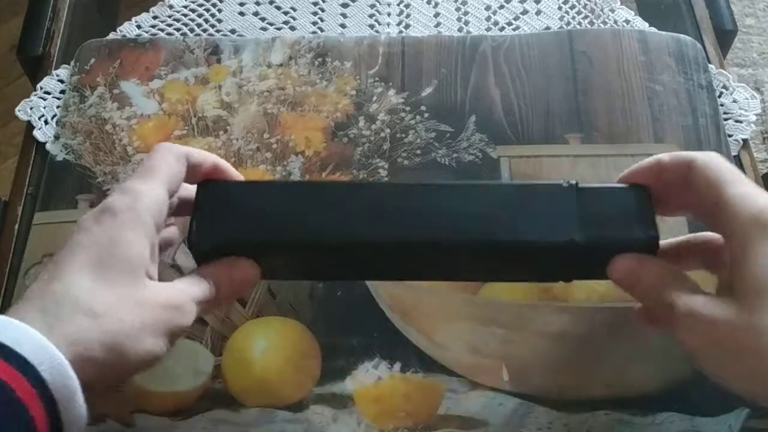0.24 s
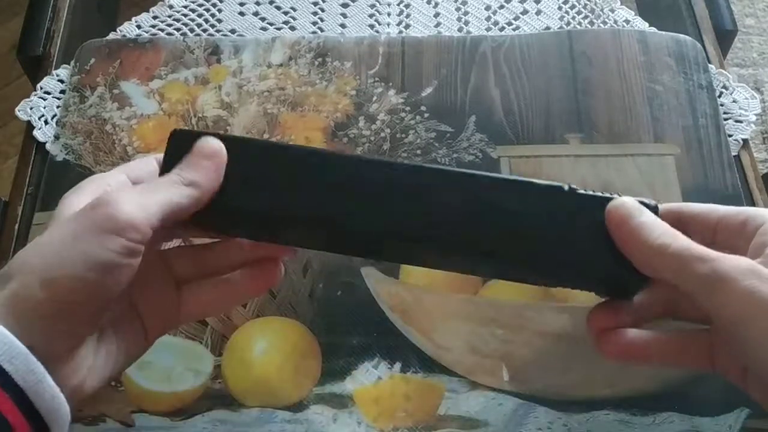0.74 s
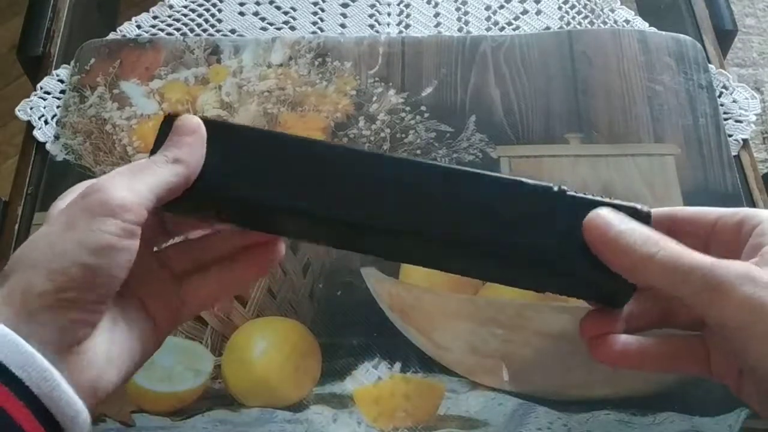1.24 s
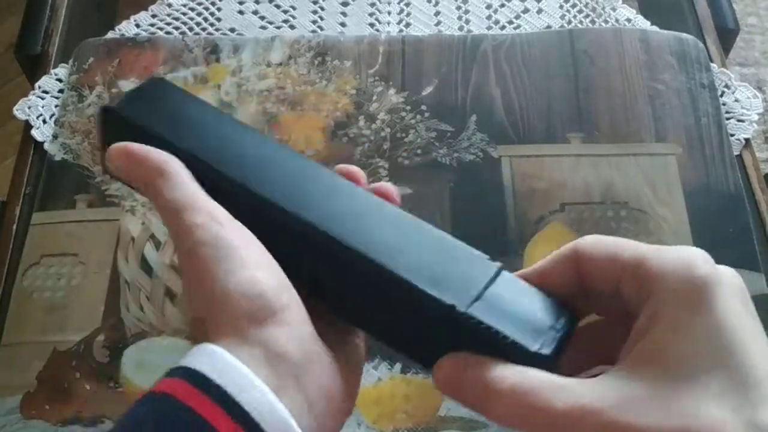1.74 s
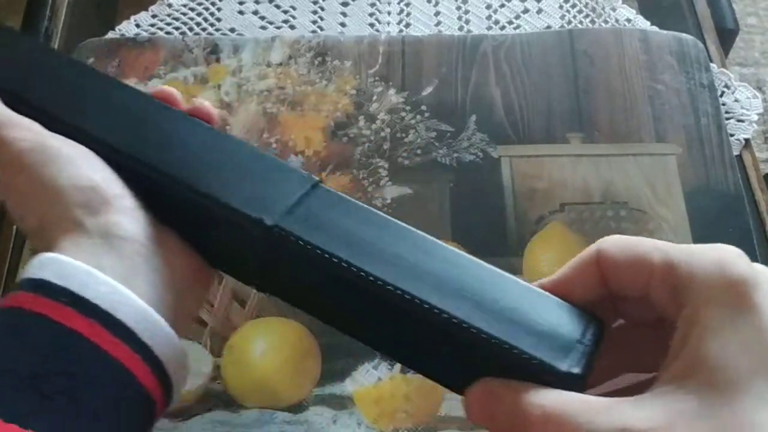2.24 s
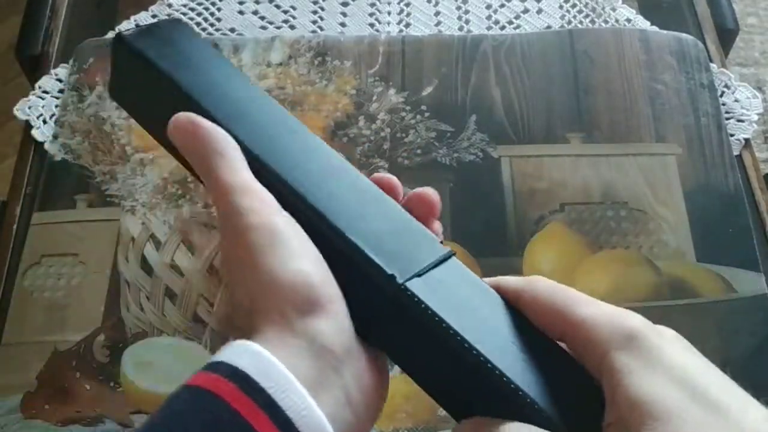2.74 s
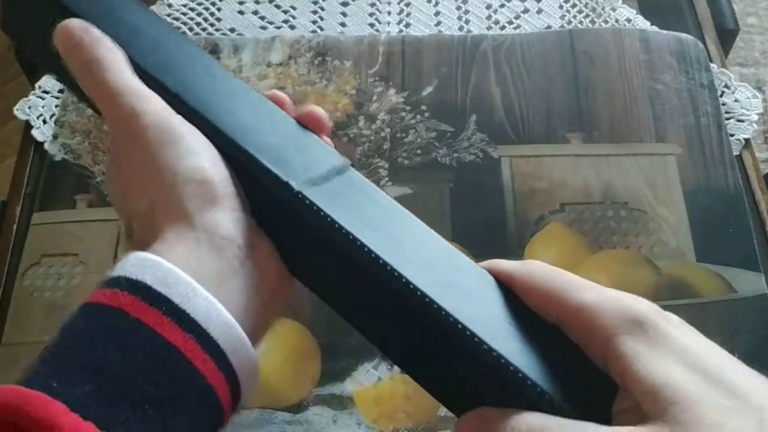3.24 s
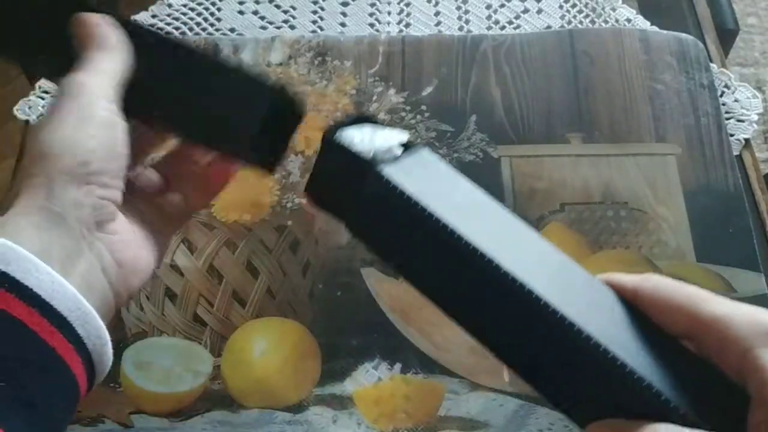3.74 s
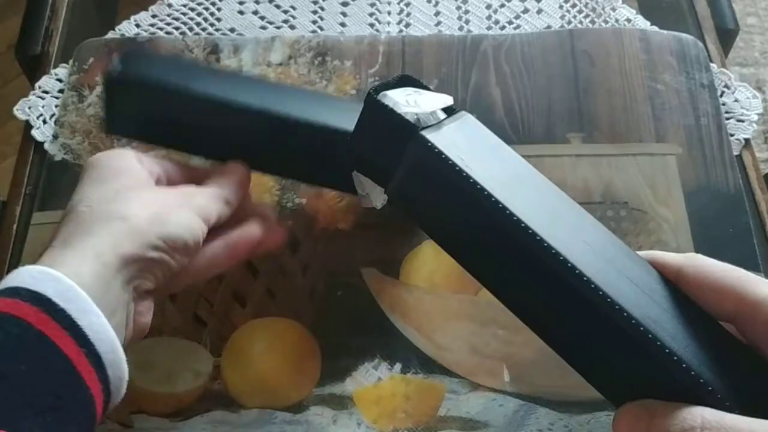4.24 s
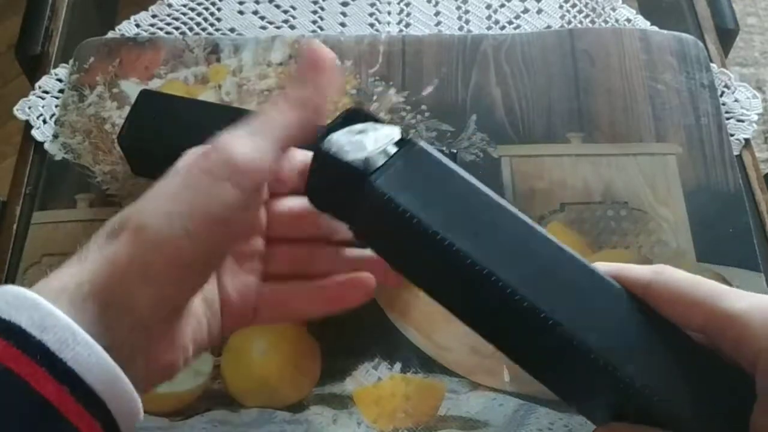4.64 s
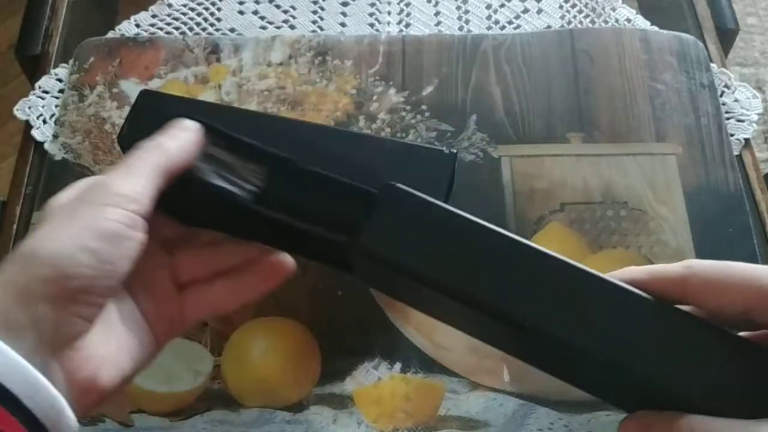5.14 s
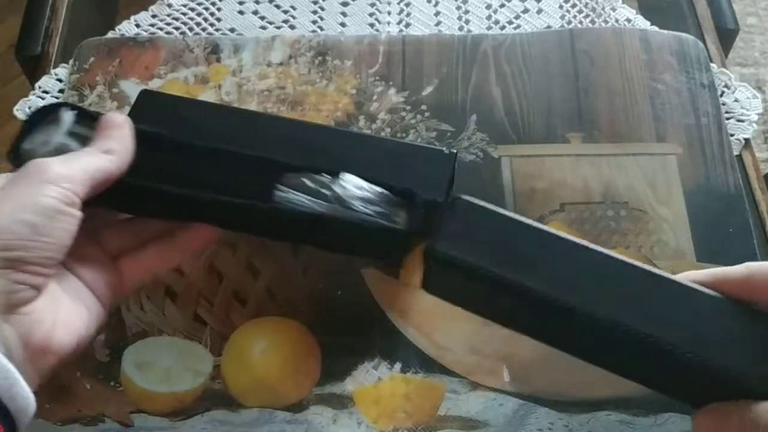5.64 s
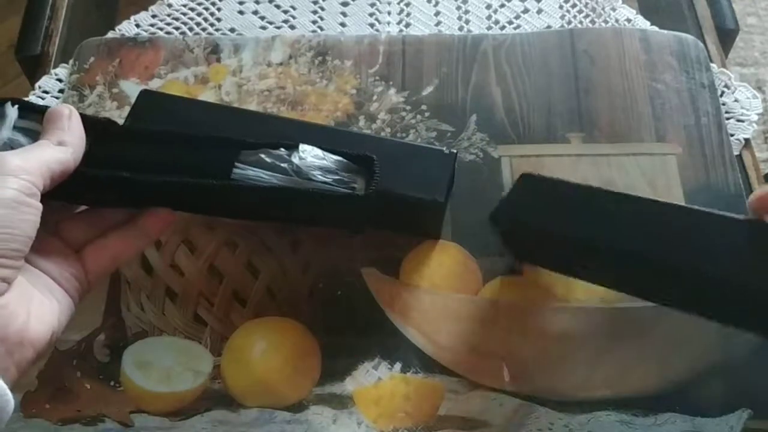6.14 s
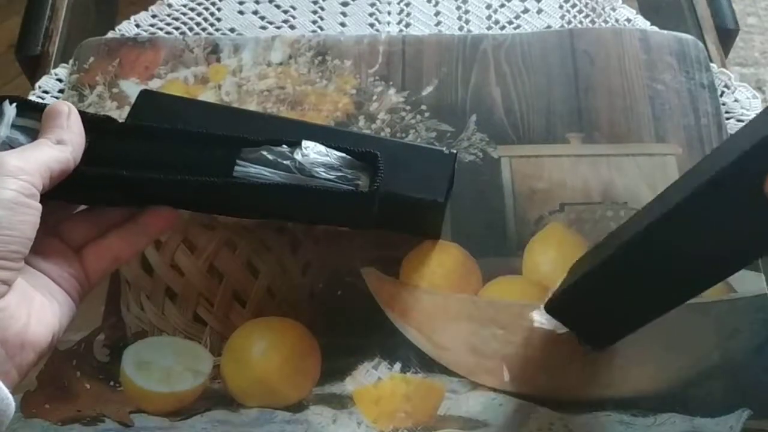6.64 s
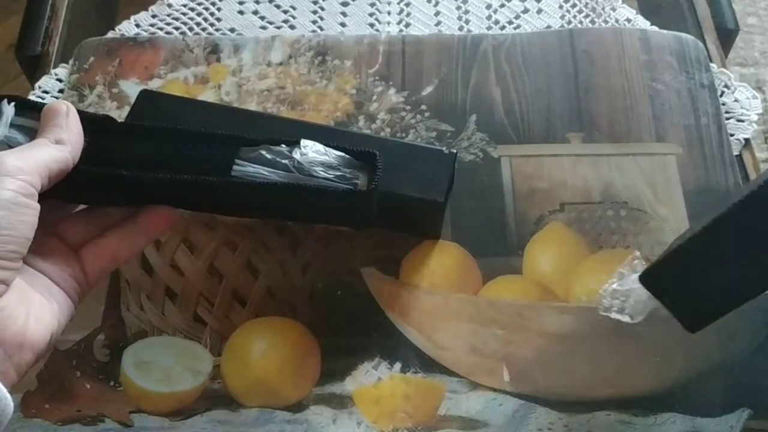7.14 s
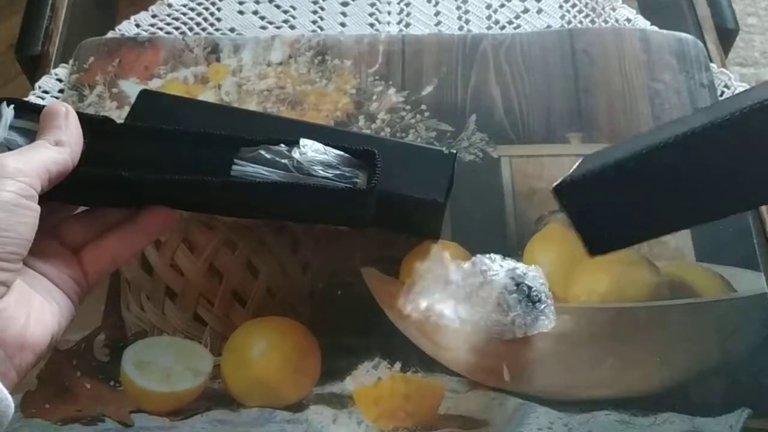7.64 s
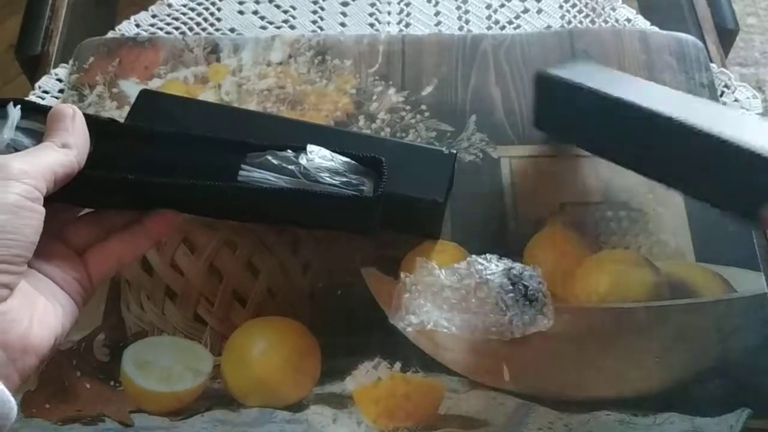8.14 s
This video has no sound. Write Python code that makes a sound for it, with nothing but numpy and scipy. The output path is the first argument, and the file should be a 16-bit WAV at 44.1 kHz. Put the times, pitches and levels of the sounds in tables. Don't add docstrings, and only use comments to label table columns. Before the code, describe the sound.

Hands rub a stiff box, its lid rasps off in ratchety ticks, knocks on a table, then plastic film crackles and a tray slides out.

```python
import sys
import numpy as np
from scipy import signal
from scipy.fft import rfft, irfft
from scipy.io import wavfile
from scipy.ndimage import uniform_filter1d

SR = 44100
rng = np.random.default_rng(int(sys.argv[2]) if len(sys.argv) > 2 else 0)


def wav_record(signal):
    frames = np.transpose(np.atleast_2d(signal))
    bounded = np.clip(frames, -1, 1)
    quanta = np.round(bounded * 32767).astype(np.int16)
    wavfile.write(sys.argv[1], SR, quanta)


def volts(x):
    e = np.asarray(x, float) / 20
    return 10 ** e


N = 370440

# freq_hz, density_db
AIR_COLOUR = [(15, -75), (25, -27), (76, -36), (124, -19.5), (192, -10.5), (220, 6), (273, -9), (389, -4),
              (553, -13), (706, -6.5), (979, -11), (1360, -12.5), (2050, -16.5), (2400, -22.5),
              (3320, -24.5), (15200, -29.5), (16500, -25)]
# freq_hz, likeness (-1 to 1)
PORT_LIKENESS = [(60, 0.44), (150, 1), (380, 0.8), (950, 0.29), (2380, 0.0035), (5980, -0.038),
                 (15000, -0.0016)]
# freq_hz, tilt_db
PORT_TILT = [(200, 0), (500, -1), (1290, -0.5), (2380, 0), (4400, -0.8), (8120, -1.5), (15000, 3)]
# freq_hz, t60_s
ROOM_DECAY = [(200, 0.25), (800, 0.37), (3000, 0.43), (8000, 0.25), (16000, 0.16)]

# freq_hz, density_db
FINE_HISS = [(3000, -22), (5000, -11.5), (7000, -6.5), (10500, -3), (14000, -6.5), (15800, -8.5),
             (16500, -54)]
# freq_hz, width_hz, level_db
COARSE_HISS = [(2700, 2600, 4), (4600, 5600, -4.5)]
# times_tube_pitch, width_hz, level_db
HOLLOW_SCRAPE = [(.68, 300, -12), (.84, 250, -7), (1.02, 262, 1), (1.4, 500, -7.5)]
# freq_hz, width_hz, level_db
LOW_RUMBLE = [(175.5, 17, 6.5), (330, 20, 5), (408, 320, -12)]
# freq_hz, width_hz, level_db
LIP_TONES = [(5000, 950, 5), (8150, 810, -5)]
# fine_hiss_db, coarse_hiss_db, hollow_scrape_db, low_rumble_db
SKIN_MIX = (-1.5, -16, -22.5, -19)
CARD_MIX = (1, -4.5, -38.5, -80)
PRESS_MIX = (-8, -1, -7, 1)
TUBE_MIX = (-27, -11, -2, -32)
# start_s, rise_s, hold_s, fall_s, level_db
SKIN_STROKES = [(1.25, 0.094, .01, 0.45, -53.5), (1.48, 0.035, 0.024, .06, -46),
                (1.5, 0.1, 0.046, 0.12, -43.5), (1.7, 0.036, 0.035, 0.22, -53),
                (2.36, 0.049, 0.059, 0.36, -48), (2.42, 0.18, 0.081, 0.19, -38.5),
                (3.262, 0.017, .002, .004, -43), (2.94, .02, .002, .004, -47),
                (3.345, 0.015, 0.0053, 0.085, -28.5), (3.44, 0.095, 0.09, 0.19, -53.5),
                (3.71, 0.044, 0.022, 0.09, -36.5), (3.8, 0.055, 0.035, 0.093, -46),
                (4.01, 0.046, .015, 0.019, -48), (4.09, 0.058, 0.11, .08, -47),
                (4.68, 0.095, .004, 0.048, -40.5), (4.83, 0.042, 0.043, 0.96, -38.5),
                (5.912, 0.0073, .004, 0.091, -32.5), (5.7, 0.19, 0.12, .1, -52.5),
                (6.66, 0.051, 0.16, 0.4, -50.5), (7.18, 0.059, 0.061, .055, -45.5),
                (7.345, 0.051, 0.048, 0.017, -34), (7.47, .03, .01, 0.16, -38.5),
                (7.54, 0.019, .11, 0.29, -45.5), (7.94, 0.04, .004, 0.045, -50.5)]
# start_s, rise_s, hold_s, fall_s, level_db
CARD_STROKES = [
    (4.9, 0.11, 0.092, 0.14, -40.5),
    (4.9, 0.24, .12, 0.18, -36),
    (5.3, 0.066, 0.013, 0.029, -47),
    (5.33, 0.21, 0.11, 0.021, -37.5),
    (5.91, 0.02, 0.0045, 0.25, -43),
    (6.05, 0.31, 0.17, 0.13, -42),
    (6.4, 0.18, 0.036, 0.095, -33.5),
    (7.86, 0.006, 0.02, 0.08, -46),
    (8.19, 0.078, .004, 0.13, -43.5),
    (8.3, 0.047, .06, .05, -42),
]
# start_s, rise_s, hold_s, fall_s, level_db
PRESS_STROKES = [(.26, 0.058, .004, 0.15, -52.5), (.33, .1, 0.04, 0.13, -46),
                 (.971, 0.0033, 0.0035, 0.13, -42.5), (4.21, 0.014, .01, 0.48, -49.5),
                 (4.42, 0.012, 0.024, 0.095, -46), (6.1, 0.065, 0.034, 0.053, -55),
                 (5.1, 0.12, .08, .1, -59), (1.925, .028, .004, 0.023, -39),
                 (2.935, 0.022, .004, 0.022, -40.5), (3.5, 0.01, 0.0036, 0.021, -50.5),
                 (4.85, 0.012, 0.0077, 0.066, -44.5), (6.12, 0.0083, 0.0033, 0.064, -42),
                 (7.02, 0.05, 0.005, 0.23, -50.5), (8.11, 0.0037, 0.055, 0.19, -51.5)]
# start_s, rise_s, hold_s, fall_s, level_db
TUBE_STROKES = [(4.22, 0.068, .004, .03, -42), (4.92, 0.072, .004, 0.39, -38),
                (5.43, 0.03, 0.0018, 0.29, -47), (6.15, 0.056, 0.03, 0.087, -35.5),
                (6.2, .1, 0.091, .1, -42.5), (6.495, 0.024, 0.033, 0.042, -31),
                (6.54, .02, 0.05, 0.062, -46), (6.65, 0.2, .004, 0.31, -52.5),
                (7.47, 0.018, .004, 0.049, -30), (8.11, 0.0034, 0.056, 0.03, -32),
                (8.22, 0.04, 0.03, .05, -40.5), (8.35, .015, .008, .05, -30)]
# start_s, rise_s, hold_s, fall_s, level_db
LIP_CATCHES = [
    (5.66, 0.0037, .004, 0.05, -50),
    (5.92, 0.0071, 0.0093, 0.094, -43.5),
    (7.86, 0.0054, .02, 0.14, -46.5),
    (8.11, .004, .01, 0.12, -68),
    (8.355, .003, 0.0036, 0.065, -49),
]
# peak_s, level_db
JOLTS = [(.332, -42), (1.36, -49), (1.638, -42), (1.93, -41.5), (2.64, -71), (2.8, -53), (2.95, -47),
         (3.36, -36), (3.467, -45), (3.709, -41), (4.113, -52), (4.19, -46.5), (4.5, -40), (4.65, -39.5),
         (4.77, -58), (4.866, -41.5), (4.958, -42.5), (5.69, -59), (6.054, -47), (6.17, -42),
         (6.634, -36.5), (6.816, -39), (7.076, -43.5), (7.282, -42), (7.41, -41.5), (7.5, -35),
         (7.638, -47), (8.165, -46), (8.34, -40), (8.38, -35)]
# start_s, pitch_hz
TUBE_PITCH = [(4.3, 1400), (5.0, 1440), (5.2, 1300), (5.6, 1730), (6.2, 1540), (6.45, 1670), (6.53, 1250),
              (6.62, 1510), (7.5, 1560), (8.12, 1580), (8.3, 1610), (8.37, 1400)]

# start_s, level_db, left_over_right_db, centre_hz
FILM_SNAPS = [(4.6963, -43, 0, 12000), (4.7113, -40, -1, 11800), (4.735, -26, 2, 11000),
              (4.742, -36, 0, 12000), (4.7664, -27, -3, 7000), (4.825, -32, 0, 10300),
              (4.839, -28, 0, 10500), (4.846, -29, 0, 11500), (4.853, -29, 0, 9500),
              (4.8666, -25, 0, 11900), (4.874, -31, -2, 12500), (4.886, -28, 3, 11000),
              (4.895, -24, 2, 11000), (4.9126, -23, -4, 10000), (4.944, -22, -2, 9240),
              (4.959, -32, 0, 10000), (4.9822, -24, 5, 9940), (5.003, -32, 1, 10000),
              (5.0114, -32, 2, 10000), (5.2774, -52, -5, 8600), (5.374, -23, -2, 9000),
              (5.6606, -24, 4, 5000), (5.7768, -33.5, -4, 9000), (5.786, -43, 0, 12940),
              (5.797, -37, 0, 10000), (6.7191, -34, 1.0, 9000), (6.8883, -40, 4, 9050),
              (6.9775, -34, 1.5, 9000), (7.023, -32.5, 4, 9000), (7.0595, -32.5, 2.5, 9000),
              (7.2328, -39, 2, 10000), (7.285, -29, 1, 10000), (7.358, -37, 1.5, 11000),
              (7.3769, -33, 0, 11000), (7.3874, -28, 0, 10000), (7.399, -32, 2, 11000),
              (7.437, -28, 0, 11000)]
# start_s, level_db
CREASES = [
    (5.3294, -34),
    (5.3542, -26),
    (5.3644, -33),
    (5.4031, -35),
    (5.4174, -42),
    (5.451, -41),
    (5.477, -38),
    (5.4994, -33),
]

# times_ring_pitch, level_db, t60_s_times_pitch
HOLLOW_RING = [(1, 0, 13), (.74, -6, 11), (1.2, -7, 11), (1.4, -4, 11), (1.75, -6, 10), (2.1, -8, 10),
               (2.6, -11, 10)]
# times_boom_pitch, level_db, t60_s
BOOM = [(0.99, 4.5, 0.33), (0.29, 21, 0.061), (0.93, 7, 0.036), (0.74, -40, 0.02)]
# start_s, level_db, crack_over_db, boom_over_db, ring_hz
KNOCKS = [(4.197, -5, -21, -26.5, 1404), (4.228, -24.5, -3, -28, 1690), (4.332, -0.5, -10.5, -36, 1310),
          (4.3661, -10, -9, -15.5, 1480), (4.436, -17.5, -13.5, -21, 1270), (4.46, -35, -10, -28, 1360),
          (4.77, -39.5, 4, -5, 716), (6.123, -13, -12, -22, 1390), (7.4796, -16.5, -6.5, -11, 1710),
          (7.4819, -26, 1.5, -25, 1700), (7.4858, -24, -4, -23, 1740), (8.113, -18, -12.5, -16, 1360),
          (8.14, -30.5, -7, -3, 1490), (8.352, -34, 3, -21, 1230), (8.356, -7.5, -6, -35, 1500),
          (8.364, -18.5, -13, -11.5, 1380), (8.377, -15, -24, -27, 1390)]
# start_s, level_db, ring_hz
RATTLES = [
    (0.366, -28, 1340),
    (4.044, -26.5, 1400),
    (6.51, -15, 1240),
    (6.519, -24, 1300),
    (6.525, -16.5, 1150),
    (6.5355, -11, 1190),
    (6.547, -24, 1250),
    (7.656, -21, 1770),
    (7.674, -22, 1710),
]
# start_s, level_db, crack_over_db, boom_over_db, boom_hz
THUDS = [
    (5.159, -22.5, -24, -6, 218),
    (6.627, -22, -23.5, -1.5, 229),
    (7.469, -8, -11.5, -12.5, 221),
    (7.488, -27, -20.5, 2, 197),
]
# start_s, level_db, crack_over_db
TRAY_POPS = [
    (5.6615, -19.5, -5.5),
    (5.6663, -18.5, -30),
    (5.677, -30, -27),
    (5.686, -30, -28),
]

# freq_hz, level_db, t60_s
WALLS = [(200, 3, 0.013), (408, 3, 0.014), (697, 8, 0.0077), (868, -1.5, 0.016), (994, -0.5, 0.013),
         (1400, -2.5, 0.014), (1890, -0.5, 0.0072), (2770, -4, 0.0057), (3970, 5, 0.0037)]
# freq_hz, level_db, t60_s
BOX_SHAKE = [(197, -12, 0.031), (129, 4, 0.073)]
# start_s, force_db
EVEN_RIDGES = [(1.954, -22.5), (1.979, -17.5), (1.997, -21), (2.013, -20), (2.026, -20), (2.042, -19),
               (2.057, -19.5), (2.071, -18.5), (2.085, -23.5), (2.1, -21), (2.115, -25), (2.129, -22),
               (2.146, -22.5), (2.16, -27), (2.174, -24), (2.187, -20.5), (2.203, -20), (2.217, -17.5),
               (2.232, -18.5), (2.246, -16.5), (2.26, -19.5), (2.277, -17), (2.293, -17), (2.312, -15),
               (2.343, -17.5)]
# start_s, squeeze_db, lid_ring_db
EVEN_GRIP = [
    (1.96, -7, 3.5),
    (2.05, 0.5, 3.5),
    (2.13, 6.5, 8.5),
    (2.21, 5.5, 1),
    (2.27, -1, 0.5),
    (2.32, -6.5, 1),
    (2.35, -5.5, -2),
]
# start_s, force_db, rasp_db, squeeze_db
JERKY_RIDGES = [(2.961, -14.5, -27, -2), (2.979, -13.5, -23, 0), (2.992, -12, -20.5, 1),
                (3.002, -15, -23.5, 5), (3.012, -17, -20.5, 5), (3.021, -14.5, -24, 3.5),
                (3.031, -20, -19, 7), (3.041, -17, -20, -1), (3.052, -11, -23.5, 1),
                (3.066, -5.5, -27, -3.5), (3.087, -16, -27, -1), (3.282, -23, -34, 0), (3.286, -11, -32, 2),
                (3.3, -10, -25, -2), (3.312, -7, -22, 3.5), (3.322, -10.5, -26, 4), (3.327, -12.5, -26, -1),
                (3.331, -7, -21, 0.5), (3.336, -13.5, -24.5, 0), (3.341, -18, -26, 1), (3.345, -15, -32, 2)]
# start_s, rise_s, hold_s, fall_s, level_db
WALL_GLIDE = [
    (1.9, 0.097, 0.23, 0.19, -29),
]


def evened(x):
    return x / np.sqrt(np.mean(x ** 2) + 1e-20)


def read(points, hz):
    f, value = np.transpose(points)
    return np.interp(np.log(hz + 1), np.log(f + 1), value)


def add(mix, s, sound):
    part = mix[..., round(s * SR):][..., :sound.shape[-1]]
    part += sound[..., :part.shape[-1]]


def band(x, lo_hz, hi_hz):
    return signal.sosfilt(signal.butter(2, [lo_hz, min(hi_hz, SR * .45)], "band", fs=SR, output="sos"), x)


def resonances(peaks, hz):
    return sum(volts(db) / (1 + (2 * (hz - f) / width) ** 2) for f, width, db in peaks)


def strokes(rows):
    power, fade_db = np.zeros(N), 28
    for start, rise, hold, fall, db in rows:
        corners = np.cumsum(np.abs([0, rise, hold, fall, fall]))
        t = np.arange(0, corners[-1], 1 / SR)
        shape = np.interp(t, corners, [-0.96, -0.012, 0.01, -1.06, -0.84])
        add(power, start, volts(db + fade_db * shape) ** 2)
    return power


def ring(modes, chance, spread_db, touch_s, size):
    hz, db, t60 = np.transpose(modes)[:, :, None]
    t = np.arange(size) / SR
    height, detune = chance[:len(modes), None], chance[-len(modes):, None]
    decay = volts(db + spread_db * height - 60 * t / t60)
    sines = decay * np.sin(2 * np.pi * hz * (1 + 0.035 * detune) * t + height)
    return sines.sum(0) * np.sin(np.pi / 2 * np.minimum(t / touch_s, 1)) ** 2


def burst(rise_s, fall_s, lo_hz, hi_hz=12200):
    t = np.arange(700) / SR
    shape = np.minimum(t / rise_s, 1) * np.exp(-np.maximum(t - rise_s, 0) / fall_s)
    shared, *apart = rng.standard_normal((3, len(t)))
    return band(shared + np.array(apart), lo_hz, hi_hz) * shape


def paired(left, other, hz):
    same = np.clip(read(PORT_LIKENESS, hz), -1, 1)[:, None]
    return np.array([left, same * left + np.sqrt(1 - same ** 2) * other])


def air():
    frames, hz = N // 512 + 5, np.fft.rfftfreq(2048, 1 / SR)
    a, b, c, d, patches = rng.standard_normal((frames, 1025, 5)).T
    patches = evened(uniform_filter1d(uniform_filter1d(patches, 10, 0), 6, 1))
    z = paired(a + 1j * b, c + 1j * d, hz)
    z = z * volts(read(AIR_COLOUR, hz)[:, None] + 1.4 * patches)
    return volts(-49) * evened(signal.istft(z, nperseg=2048, noverlap=1536)[1][:, :N])


def room(x, wet_db, near_db, lag, leak_db=-33.5):
    taps = np.zeros((2, SR // 2))
    at = np.arange(120, SR // 2 - 20, 20) + rng.integers(0, 20, (2, (SR // 2 - 121) // 20))
    np.put_along_axis(taps, at, rng.choice([-1., 1.], at.shape), 1)
    hz, t, z = signal.stft(taps, SR, nperseg=512)
    z = paired(z[0], z[1], hz)
    late = signal.istft(z * volts(-60 * t / read(ROOM_DECAY, hz)[:, None]), SR, nperseg=512)[1]
    near = signal.istft(z * volts(-60 * t / .05), SR, nperseg=512)[1]
    late = late * np.minimum(np.arange(late.shape[1]) / SR / 0.0072, 1)
    answer = volts(wet_db) * late / np.linalg.norm(late[0]) + volts(near_db) * near / np.linalg.norm(near[0])
    answer[:, :120] = 0
    answer[0, max(lag, 0)] += 1
    answer[1, max(-lag, 0)] += 1
    heard = signal.fftconvolve(x * np.ones((2, 1)), answer, axes=1)[:, :N]
    cut = signal.sosfilt(signal.cheby1(6, 1.5, 188, "high", fs=SR, output="sos"), heard)
    return cut + volts(leak_db) * heard


def rubbing():
    materials = [(SKIN_STROKES, SKIN_MIX), (CARD_STROKES, CARD_MIX),
                 (PRESS_STROKES, PRESS_MIX), (TUBE_STROKES, TUBE_MIX)]
    power = sum(volts(np.array(mix))[:, None] ** 2 * strokes(rows) for rows, mix in materials)
    jolt_rise_s, jolt_fall_s = 0.11, 0.21
    power[3] += strokes([(s - jolt_rise_s, jolt_rise_s, 0, jolt_fall_s, db) for s, db in JOLTS])
    power = [*power, strokes(LIP_CATCHES)]

    slips = volts(2.34 * np.minimum(rng.exponential(1, N), 5)) * rng.standard_normal((2, N))
    clumps = volts(1.33 * evened(uniform_filter1d(rng.standard_normal(N), 120)))
    hz, t, z = signal.stft(slips * clumps, SR, nperseg=512)
    patches = rng.standard_normal(z[0].shape)
    patches = evened(uniform_filter1d(uniform_filter1d(patches, 10, 0), 12, 1))
    streaks = evened(uniform_filter1d(rng.standard_normal(z[0].shape), size=24, axis=1))
    z = paired(z[0], z[1], hz) * volts(2.47 * patches + 3.9 * streaks)

    pitch = np.interp(t, *np.transpose(TUBE_PITCH))
    hollow = resonances([(k * pitch, w, db) for k, w, db in HOLLOW_SCRAPE], hz[:, None])
    colours = [volts(read(FINE_HISS, hz)), resonances(COARSE_HISS, hz), hollow,
               resonances(LOW_RUMBLE, hz), resonances(LIP_TONES, hz)]
    out = np.zeros((2, N))
    for p, colour in zip(power, colours):
        layer = signal.istft(z * colour.reshape(len(hz), -1), SR, nperseg=512)[1][:, :N]
        out += np.sqrt(p) * evened(layer)
    return out


def film():
    out = np.zeros((2, N))
    half_width = 2 ** 0.63
    for s, db, side_db, hz in [*FILM_SNAPS, *((*row, 0, 10500) for row in CREASES)]:
        snap = burst(0.00026, 0.0013, hz / half_width, hi_hz=hz * half_width)
        add(out, s, volts(db - 1.5 + side_db * np.array([[.5], [-.5]])) * snap)
    return out


def knocks():
    out = np.zeros((2, N))
    table_hz = 321.6
    # start_s, level_db, crack_over_db, boom_over_db, ring_hz, boom_hz
    blows = [(*row, table_hz) for row in KNOCKS]
    blows += [(s, db, -16.5, -51, hz, table_hz) for s, db, hz in RATTLES]
    blows += [(*row, 1507, boom_hz) for *row, boom_hz in THUDS]
    blows += [(*row, -18.5, 470, table_hz) for row in TRAY_POPS]
    for s, db, crack_db, boom_db, hz, boom_hz in blows:
        chance = rng.standard_normal(14)
        touch_s = .0005 * volts(-.35 * (db + 5))
        hollow = np.multiply(HOLLOW_RING, (hz, 1, 1 / hz))
        boom = np.multiply(BOOM, (boom_hz, 1, (0.0028 * boom_hz) ** 2))
        add(out, s + 0.00055, volts(db + crack_db + 3.5) * burst(0.00021, 0.0012, 2900))
        add(out, s + .0003, volts(db - 2.5) * ring(hollow, chance, 1.5, touch_s, size=2000))
        add(out, s, volts(db + boom_db - 3.5) * ring(boom, chance * 0.15, 1.1, 0.011, size=12000))
    return out


def ridges():
    out = np.sqrt(strokes(WALL_GLIDE)) * band(rng.standard_normal((2, N)), 1600, 12700)
    at, squeeze, lid = np.transpose(EVEN_GRIP)
    pulls = []  # start_s, force_db, rasp_over_db, squeeze_db, lid_ring_db
    for s, db in EVEN_RIDGES:
        squeeze_db = np.interp(s, at, squeeze)
        rasp_db = -10 + 0.56 * squeeze_db - (s - 2.15)
        pulls.append((s, 1.5 + db, rasp_db, squeeze_db, np.interp(s, at, lid)))
    pulls += [(s, db, rasp_db - db, squeeze_db, 0) for s, db, rasp_db, squeeze_db in JERKY_RIDGES]

    wall_hz = np.transpose(WALLS)[0]
    low_walls = np.outer(wall_hz < 500, (0, 1, 0))
    lid_walls = np.outer(abs(wall_hz - 950) < 150, (0, 1, 0))
    for s, db, rasp_db, squeeze_db, lid_db in pulls:
        chance = .45 * rng.standard_normal(20)
        walls = np.array(WALLS) + squeeze_db * low_walls + lid_db * lid_walls
        rasp = burst(0.0029, 0.0012, 680, hi_hz=13400)
        tick = burst(0.00011, 0.0005, 1100, hi_hz=15400)
        add(out, s - .0017, volts(db + rasp_db + 5.0) * rasp)
        add(out, s + 0.0012, volts(db + rasp_db + 1.5 + 2.5 * chance[9]) * tick)
        add(out, s + .0006, volts(db - 3) * ring(walls, chance, 2.6, .0013, size=2500))
        add(out, s, volts(1.17 * db - 6.5) * ring(BOX_SHAKE, chance, 1.1, 0.0031, size=2500))
    return out


def scene():
    mix = air() + room(rubbing(), -9, -14, lag=0)
    mix += room(knocks() + film(), -6, -27.0, lag=-3)
    pull_start_s, pull_end_s, cycles_per_s = 1.8, 3.6, 6
    start, end = round(pull_start_s * SR), round(pull_end_s * SR)
    pulled = ridges()[:, start:end]
    cycle = cycles_per_s * np.arange(end - start) / SR
    for k in range(3):
        share = (1 + np.cos(2 * np.pi * (cycle + k / 3))) / 3
        add(mix, pull_start_s, room(pulled * share, -5.0, -13.5, lag=4, leak_db=-41))
    return mix


def top_cut(x):
    return signal.sosfilt(signal.butter(12, 17000, fs=SR, output="sos"), x)


def record(dry):
    tilt = volts(np.outer([.5, -.5], read(PORT_TILT, np.fft.rfftfreq(N, 1 / SR))))
    limited = 0.92 * np.tanh(irfft(rfft(dry) * tilt, N) / 0.85)
    edge = signal.firwin(255, 16200, fs=SR)
    finished = signal.oaconvolve(limited, edge[None], "same")
    return top_cut(finished)


dry = scene()
out = record(dry)
wav_record(out)
```